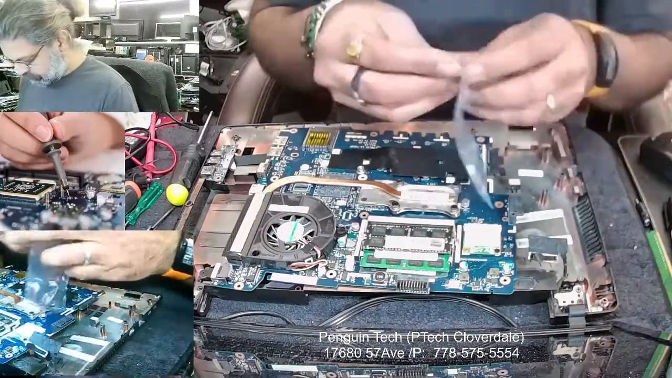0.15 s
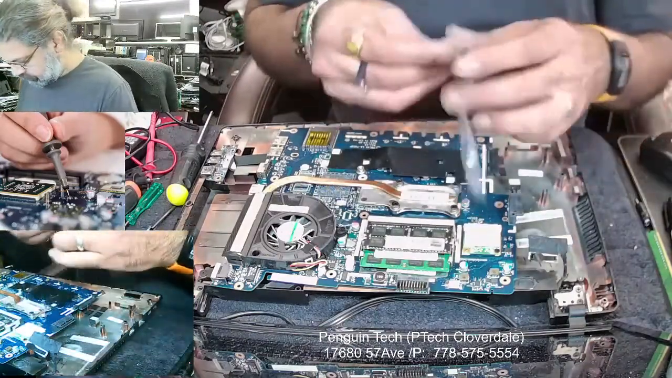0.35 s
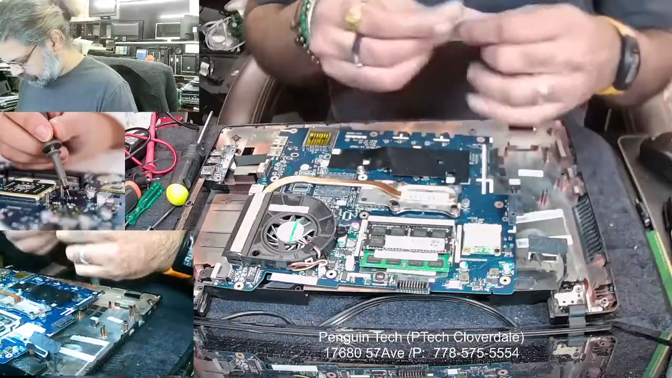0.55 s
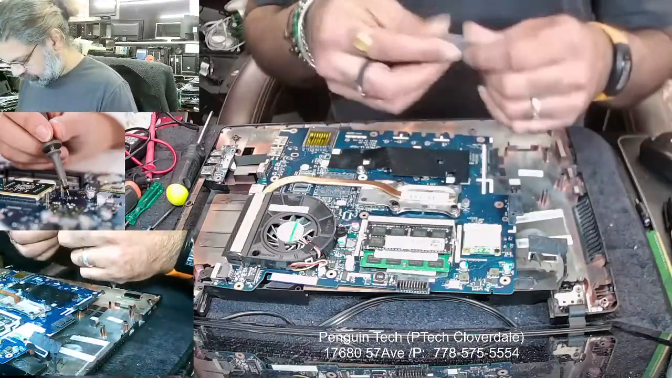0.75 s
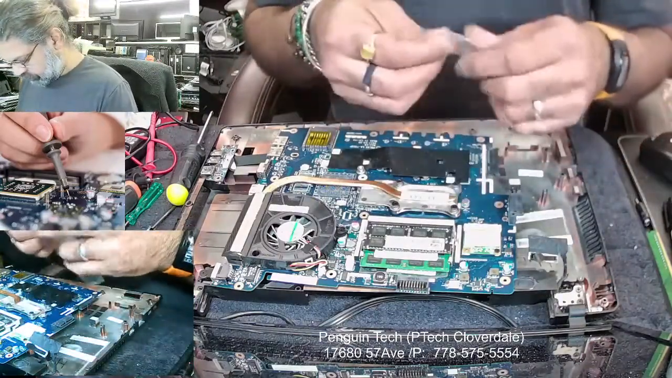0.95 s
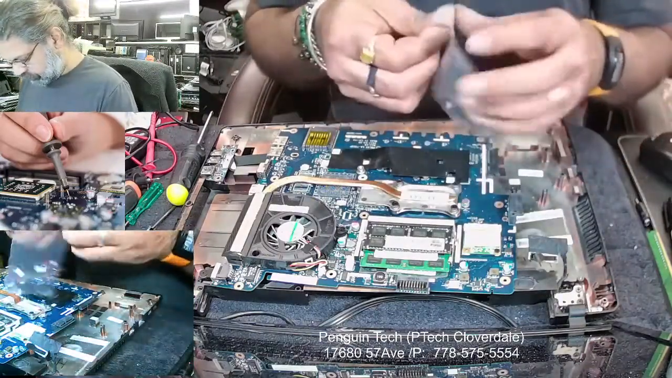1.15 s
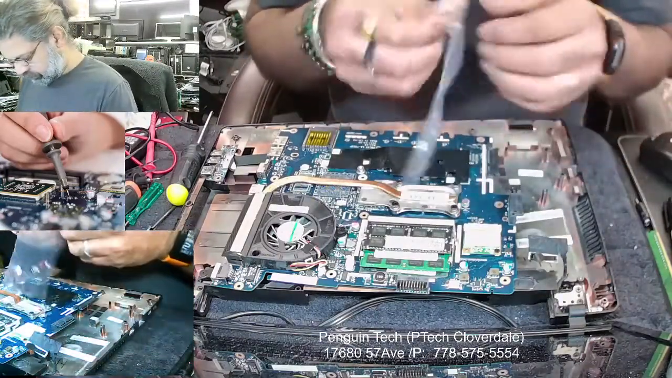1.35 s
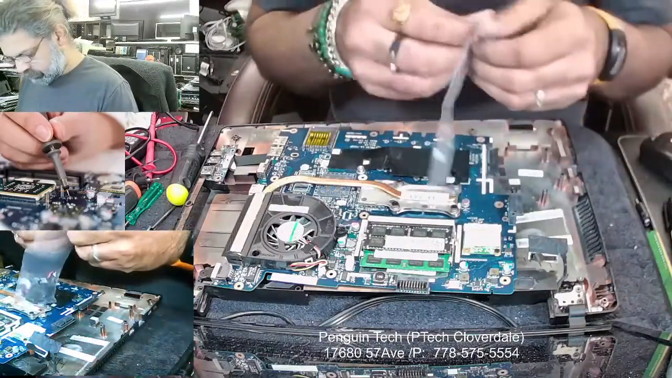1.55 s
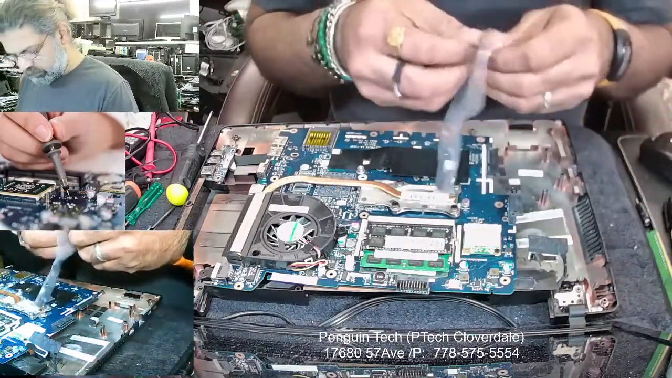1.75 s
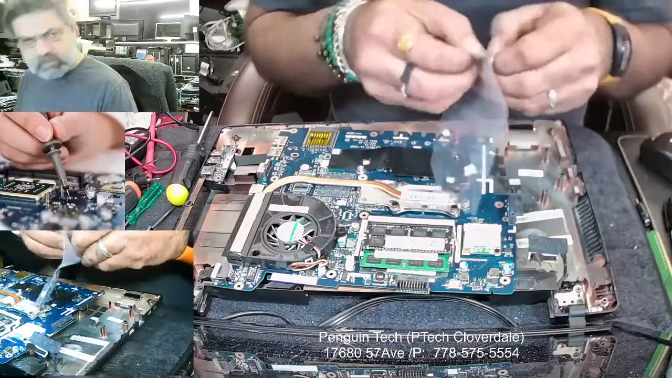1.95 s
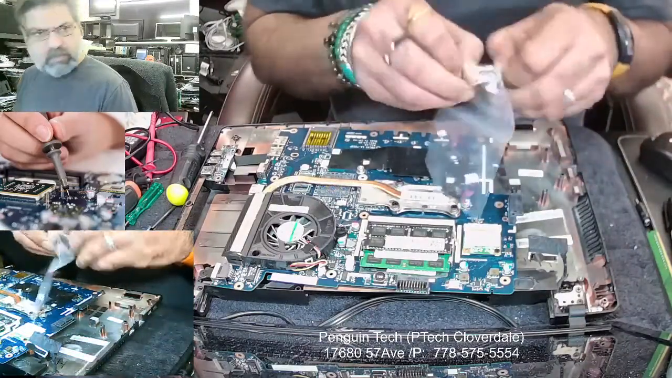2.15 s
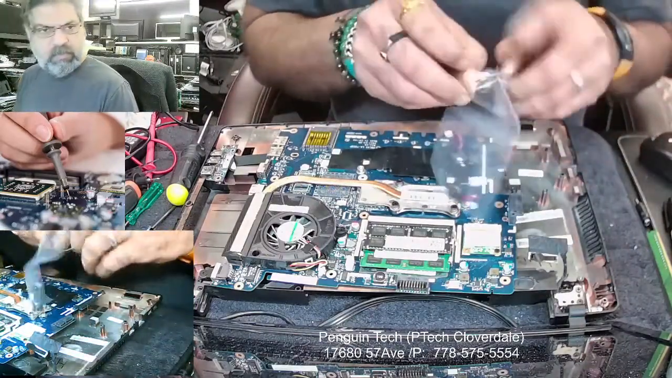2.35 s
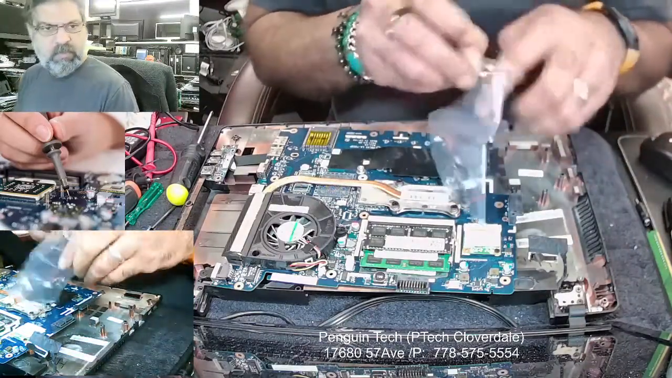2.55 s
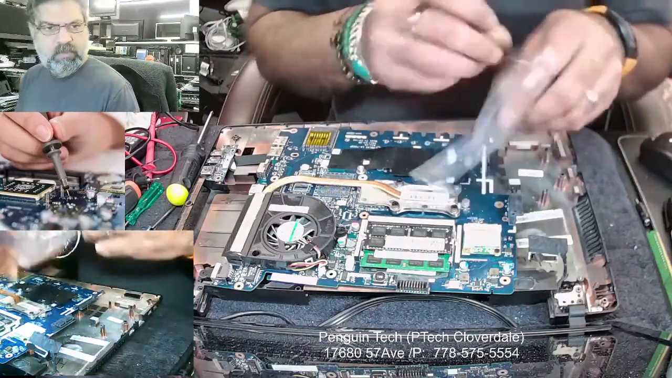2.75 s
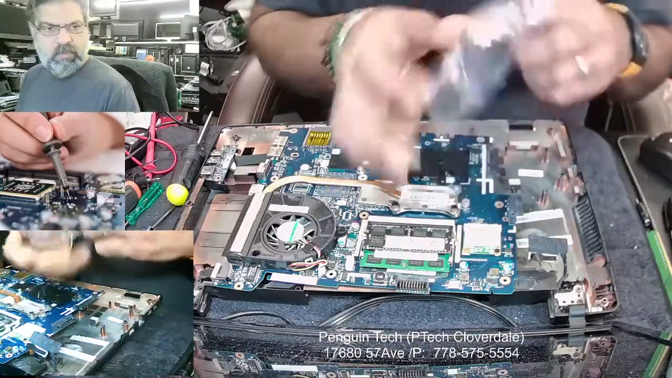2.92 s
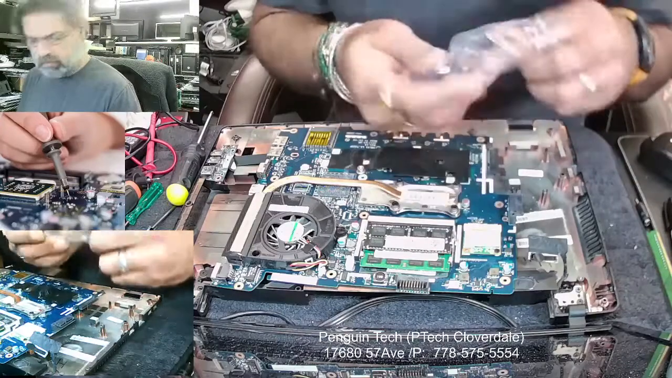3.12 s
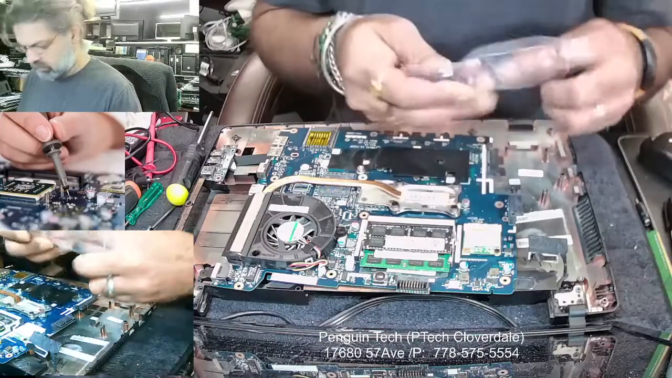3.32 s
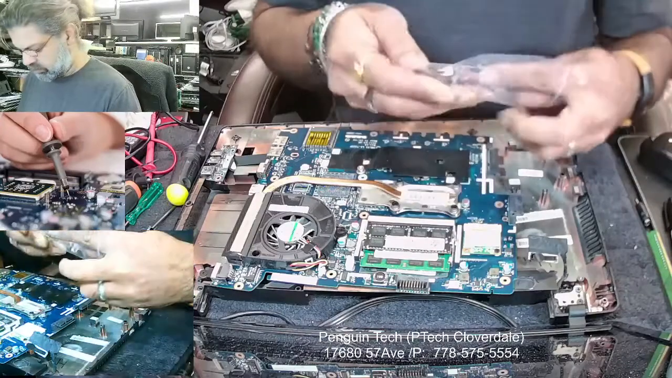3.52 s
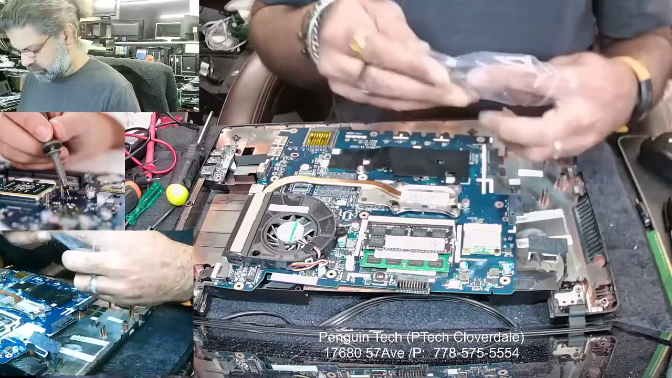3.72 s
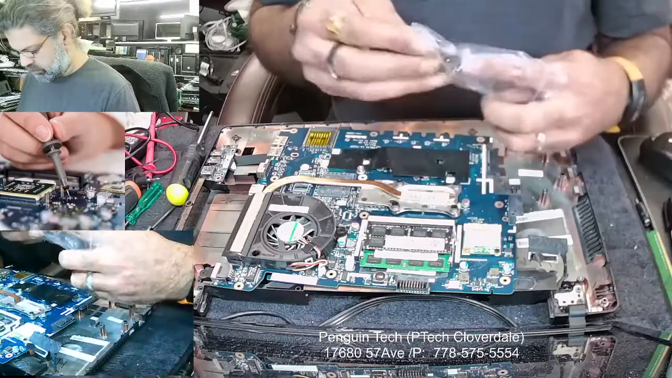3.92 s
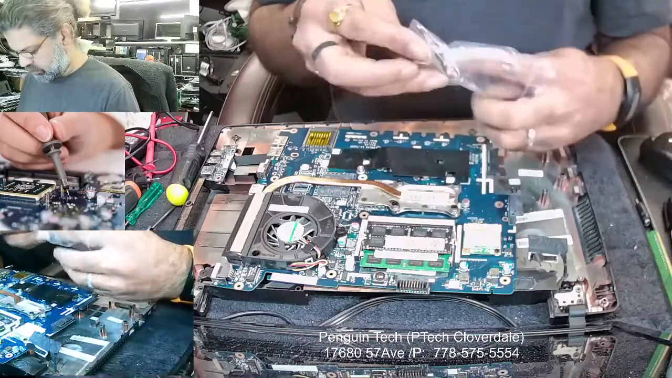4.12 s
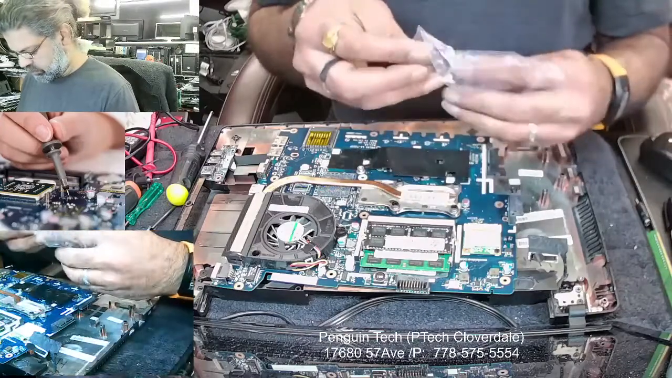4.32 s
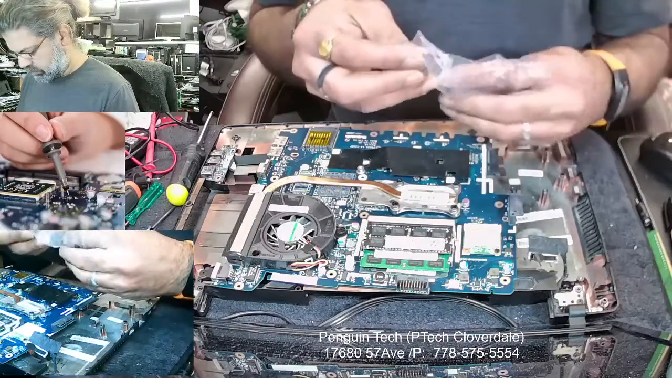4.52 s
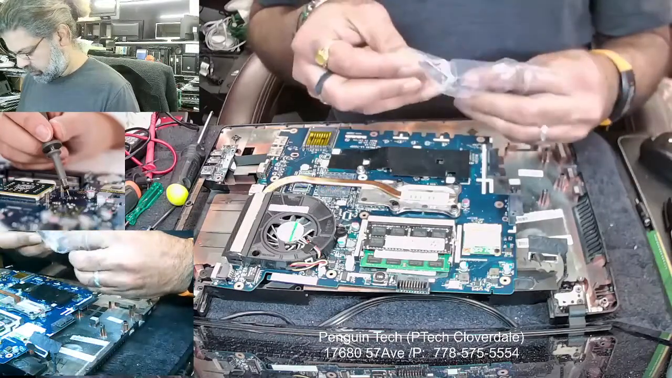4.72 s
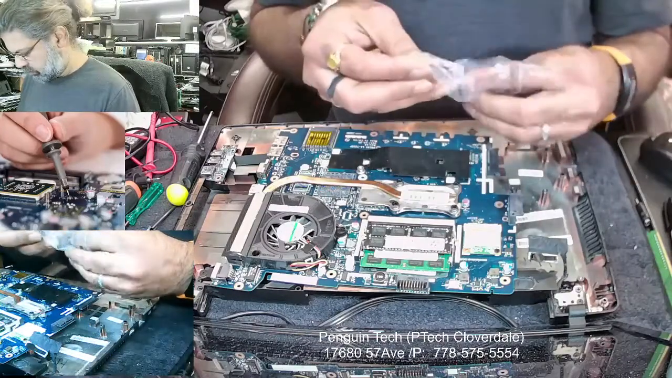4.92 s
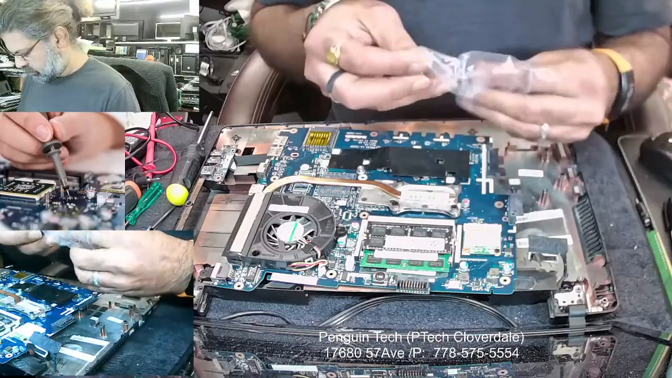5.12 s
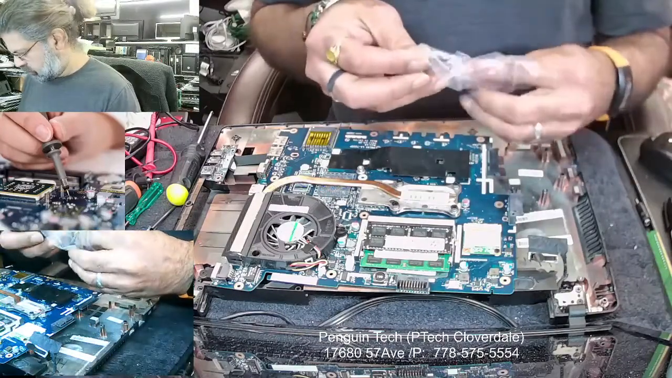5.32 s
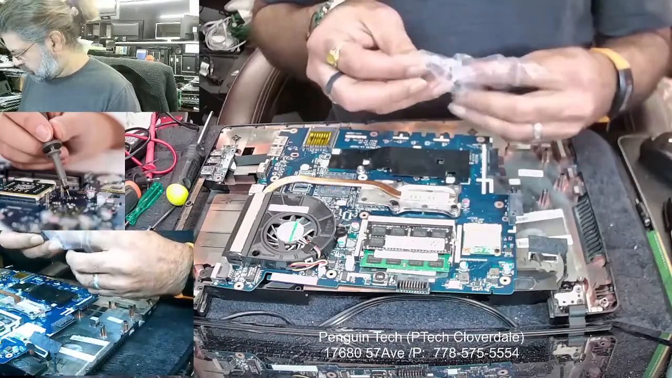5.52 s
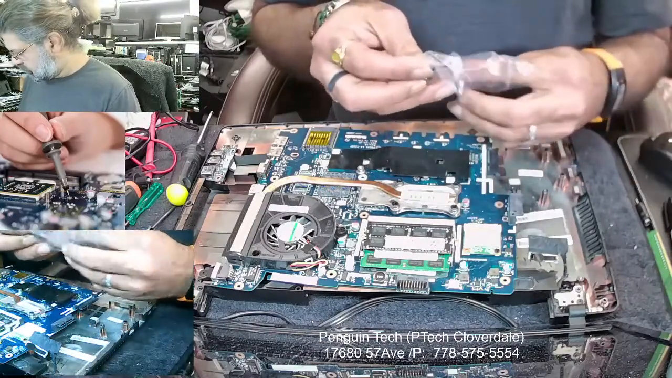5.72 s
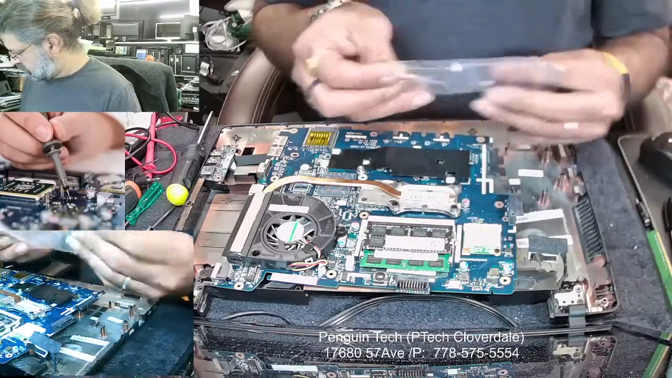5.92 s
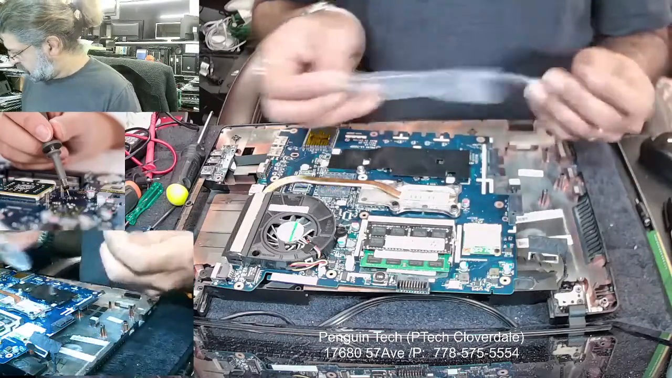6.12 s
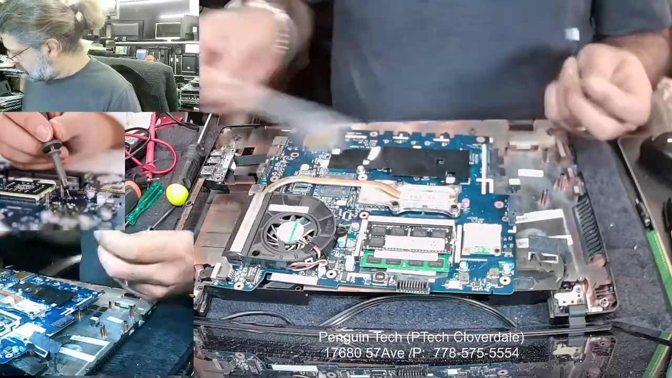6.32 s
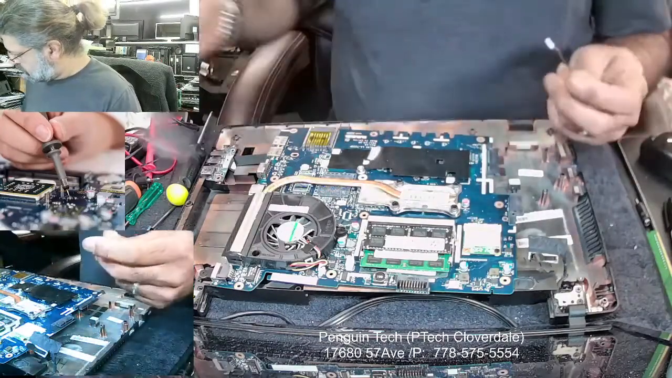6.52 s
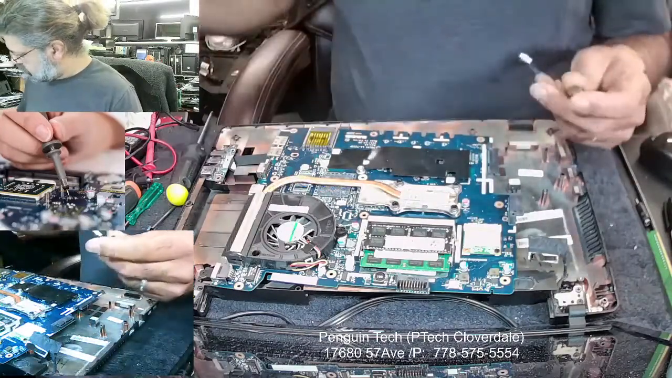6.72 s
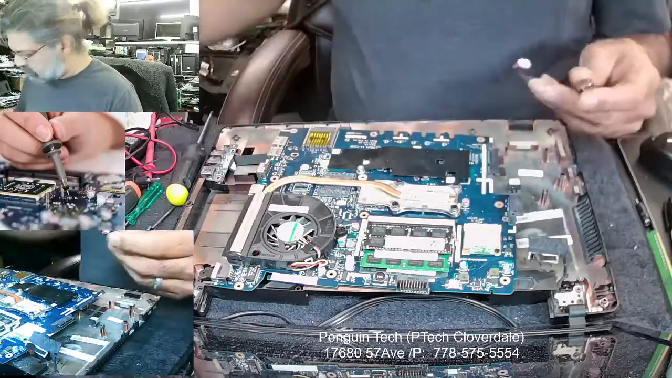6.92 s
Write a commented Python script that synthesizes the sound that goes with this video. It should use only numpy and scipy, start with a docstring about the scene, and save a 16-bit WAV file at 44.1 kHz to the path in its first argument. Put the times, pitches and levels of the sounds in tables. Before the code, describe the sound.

Hands work open a little plastic bag with crisp, uneven crackling that builds and then thins, against low room hum.

```python
"""Two hands worry open a small, stiff plastic bag over a workbench, heard through a narrow-band microphone.
From the start, mains hum, fan tones and room air fill the small shop. A few creases buckle, each snap
ringing three patches of film. From about 2 to 3 s the snaps crowd together and fine crackle fills the
loudest bursts, while a distant engine drones past. A weaker flurry comes near 4 s; then the snaps
thin out and end, and the hum remains."""
import sys
import numpy as np
from scipy import signal
from scipy.fft import rfft, irfft
from scipy.io import wavfile

SR = 44100
rng = np.random.default_rng(int(sys.argv[2]) if len(sys.argv) > 2 else 0)


def digitize_waveform(pressure):
    """Quantize a signal to 16-bit integers and store it at the path in sys.argv[1].

    Rows of a 2-D input are taken as channels; values are limited to [-1, 1].
    """
    field = np.atleast_2d(pressure).T
    bounded = np.clip(field, -1, 1)
    quanta = np.round(bounded * 32767).astype(np.int16)
    wavfile.write(sys.argv[1], SR, quanta)


N = 307377

# buckling creases: (time [s], level [dB], main patch [Hz], width [ms], side patches re main [dB])
SNAPS = [(.173, -37, 6490, .55, -1.5), (0.189, -33.5, 4970, 1.07, -2.5), (0.2243, -35.5, 4350, 1.5, -6),
         (0.8494, -44, 4130, 1.86, -27), (0.9258, -41.5, 6930, 0.71, -21), (1.037, -57, 4390, 0.65, -5),
         (1.199, -42.5, 5485, 2, -6.5), (1.2134, -41.5, 3985, 0.88, -6.5), (1.2999, -38, 4220, 2, -17),
         (1.336, -41.5, 4900, 0.62, -25), (1.3611, -44, 4370, 1, -14), (1.391, -51, 4960, 1.56, -19),
         (1.418, -48.5, 4630, 0.76, -13), (1.614, -50, 4236, 4, -18), (1.8265, -35, 5130, 1.5, -10),
         (1.864, -21.5, 4350, 0.89, -11.5), (1.886, -36.5, 5570, .8, -4), (1.9132, -37.5, 5180, 1.3, -10.5),
         (1.926, -37.5, 3770, .9, -13.5), (1.941, -34, 4400, 0.75, -1.5), (1.9497, -26, 4080, 0.69, -6.5),
         (1.982, -52.5, 4480, .6, 4.5), (2.0839, -29, 3150, 1.1, -7.5), (2.096, -31, 3034, 1.03, -5.5),
         (2.1124, -33, 2900, 2.4, -1), (2.127, -25.5, 5260, .5, -4), (2.152, -33, 4330, 0.75, -4),
         (2.237, -28, 4860, 1.8, -15.5), (2.2462, -37.5, 2810, 1.2, 0), (2.2723, -28, 4190, 0.93, -5.5),
         (2.2906, -27.5, 3960, 0.73, -2), (2.3201, -25.5, 2996, 1.11, -1.5), (2.342, -42, 4810, 0.76, -17),
         (2.428, -35, 4220, .8, -13.5), (2.4569, -33, 3970, .7, -5), (2.4831, -19, 4140, 0.65, -8),
         (2.4946, -15.5, 4530, 0.7, -17.5), (2.5275, -27, 4350, 0.75, -5), (2.5326, -20, 4260, 0.6, -3),
         (2.539, -23, 4690, .9, -10.5), (2.6139, -26, 5350, .6, -1.5), (2.63, -35, 4760, 1.06, -10),
         (2.6356, -29, 4930, 0.89, -11), (2.695, -36, 4120, 0.83, 4.5), (2.7063, -34, 4480, 0.68, -2),
         (2.7239, -34, 4370, .8, -5.5), (2.743, -44, 4600, 0.54, -2), (2.757, -35.5, 4110, 1.02, -4),
         (2.767, -33.5, 4070, .9, -5.5), (2.8676, -38.5, 4610, 0.49, -2), (2.896, -31, 4820, 0.76, -6.5),
         (2.9239, -23.5, 4100, 1.15, 0), (2.933, -31, 4700, 1.2, -9.5), (2.9397, -26.5, 4410, 0.9, -19),
         (2.9493, -40, 4820, .6, -9.5), (2.968, -29.5, 4100, .7, -5), (2.9854, -30, 5016, 2.43, -6.5),
         (3.075, -32, 4870, .6, -7.5), (3.0876, -38, 4260, 0.56, -16.5), (3.1572, -45.5, 4700, 0.71, -0.5),
         (3.222, -41.5, 4075, 0.95, -30), (3.2478, -46, 4150, .9, -4), (3.307, -50, 4600, .7, -1),
         (3.426, -57, 4760, 0.93, -0.5), (3.464, -46, 4255, 0.6, -7), (3.637, -55, 4150, 2.1, -19),
         (3.655, -50, 3985, 4.4, -19), (3.744, -44.5, 5140, 2.7, -20), (3.766, -54.5, 3574, 5.4, -23),
         (3.8238, -35, 5050, 0.9, -16), (3.834, -45.5, 4710, 1.7, -5.5), (3.939, -26, 5220, 0.85, -6.5),
         (3.964, -37, 4600, 2.2, -8.5), (4.019, -29.5, 4480, 0.5, -11), (4.05, -39.5, 4960, .6, -5.5),
         (4.066, -44, 4490, 0.53, -9.5), (4.114, -49.5, 4290, 0.24, 0), (4.139, -53, 5190, 0.44, -3.5),
         (4.164, -40, 4360, 0.98, -14), (4.18, -28.5, 5230, 0.66, -17.5), (4.184, -30.5, 3050, 0.84, -5.5),
         (4.1887, -32.5, 4780, 0.86, -7.5), (4.213, -42.5, 4930, 0.82, 0), (4.275, -51.5, 3505, 0.62, 1),
         (4.306, -42, 3086, 2.7, -4), (4.334, -38, 4960, .6, -8.5), (4.34, -33, 3900, 0.95, -7.5),
         (4.356, -39.5, 4280, 2.2, -9.5), (4.374, -45, 4060, 0.87, -4.5), (4.42, -46, 4640, 3.5, -15.5),
         (4.4972, -41.5, 4150, 2, -27), (4.506, -42, 4030, 1.2, -12.5), (4.5201, -36, 4205, 1.87, -42),
         (4.551, -37, 4400, 0.88, -19.5), (4.6215, -60, 4630, .8, -7), (4.626, -22.5, 4535, 0.75, -21),
         (4.6821, -37, 4560, .55, -10.5), (4.7278, -45.5, 4430, 0.78, -8), (4.7729, -40.5, 4600, 0.8, -12),
         (4.811, -52.5, 4760, 1.2, -13), (4.835, -54.5, 4430, 1.8, -8.5), (4.9287, -47.5, 4200, .6, -2.5),
         (4.9647, -51, 4400, 0.86, -15), (4.974, -46.5, 4410, 1.9, -25), (5.057, -48.5, 4220, 0.55, -5),
         (5.083, -44, 4110, 0.84, -12.5), (5.112, -32, 4520, 0.84, -28), (5.1342, -35.5, 4450, 1.15, -29),
         (5.169, -33, 4240, 0.79, -12.5), (5.195, -31, 4690, 1.1, -30), (5.202, -47, 4910, 0.63, -13.5),
         (5.283, -59, 5050, .5, -1.5), (5.357, -42, 4820, 1.6, -34), (5.368, -47, 4420, 1.1, -10),
         (5.415, -53.5, 6150, 0.65, 2), (5.432, -47, 6360, 0.84, -11.5), (5.4562, -49, 5170, 4.5, -3),
         (5.489, -45.5, 3330, .8, -8), (5.563, -51.5, 4800, .5, -9), (5.63, -48, 4960, 0.8, -7.5),
         (5.6464, -45.5, 4100, .75, -5), (5.685, -44, 5000, 0.47, -8.5), (5.7154, -41, 5390, 1.6, -31),
         (5.7449, -40.5, 4463, 4.1, -11.5), (5.861, -47, 4960, 0.83, -10.5), (5.886, -51, 4800, 0.5, -8.5),
         (5.917, -50, 4570, 1.03, -10.5), (6.011, -56.5, 4800, .45, 0.5), (6.024, -52.5, 4580, 0.52, -6),
         (6.1354, -48, 4690, 0.46, -8.5),  (6.349, -64, 5150, 0.48, -1)]
# colour that film and microphone give to a crack: (frequency [Hz], relative gain [dB])
FILM_SPECTRUM = [(300, -77), (1000, -35), (2300, -17), (2700, -8.5), (3500, -13), (4150, 0), (5000, -0.5),
                 (6000, -5.5), (6900, -8.5), (8000, 4.5)]
# natural frequencies of small patches of film: (frequency [Hz])
PATCH_HZ = [2706, 3002, 3347, 3693, 4220, 4540, 4600, 4960, 5800, 5750, 5740, 6850]
RISE_WIDTHS = 1.5   # widths a pop takes to reach its peak


def from_db(db):
    """Decibels to amplitude ratio."""
    return 10 ** (np.asarray(db) / 20)


def rms_one(x):
    """Normalisation to unit rms."""
    return x / np.sqrt(np.mean(x ** 2) + 1e-20)


def add(out, s, burst):
    """Superposition of a burst, starting at time s."""
    i = max(round(s * SR), 0)
    out[i:i + len(burst)] += burst[:N - i]


def coloured(x, spectrum):
    """Minimum-phase filtering by a (frequency [Hz], gain [dB]) curve."""
    hz, db = np.transpose(spectrum)
    grid = np.maximum(np.fft.rfftfreq(4096, 1 / SR), 1)
    cepstrum = irfft(np.log(from_db(np.interp(np.log(grid), np.log(hz), db))))
    cepstrum[1:2048] *= 2   # folding the cepstrum makes the filter causal
    cepstrum[2049:] = 0
    return signal.fftconvolve(x, irfft(np.exp(rfft(cepstrum))))[:len(x)]


def drift(per_s):
    """Slow fluctuation: linear interpolation between random knots."""
    return np.interp(np.arange(N) / SR * per_s, np.arange(400), rng.standard_normal(400))


def hum_and_fans():
    """Steady tones of the mains and two fans; close pairs beat by interference."""
    # mains hum, then blade tones: (frequency [Hz])
    tone_hz = [120.0, 259.07, 345.41, 352.86, 388.56, 427.01, 431.76, 518.06, 533.7]
    # strength of each tone: (rms level [dB])
    tone_db = [-72.5, -86, -78.5, -93, -91, -80.5, -82.5, -88.5, -91]
    t = np.arange(N) / SR
    return np.sqrt(2) * sum(from_db(db) * np.sin(2 * np.pi * (hz * t + rng.random()))
                            for hz, db in zip(tone_hz, tone_db))


def distant_engine():
    """Harmonics of the engine cycle swell and fade, sinking in pitch as it passes."""
    # the engine's passage: (time [s], cycle rate [Hz], level [dB])
    passage = [(0, 53, -100), (.4, 52.5, -95), (1.0, 49.1, -85), (1.9, 49.5, -82.5), (2.3, 48.54, -81),
               (3.0, 48.1, -82.5), (3.5, 47.2, -90.5), (4.2, 47.4, -105)]
    # its harmonics: (multiple of the cycle rate, relative level [dB])
    orders = [(2, 0), (3, -4), (4, -6), (5, -7)]
    times, *curves = np.transpose(passage)
    cycle_hz, level_db = (np.interp(np.arange(N) / SR, times, curve) for curve in curves)
    turns = np.cumsum(cycle_hz) / SR
    drone = sum(from_db(db + drift(1.2)) * np.sin(2 * np.pi * k * turns) for k, db in orders)
    return np.sqrt(2) * from_db(level_db) * drone


def room_air():
    """Stationary broadband noise, strongest at low frequencies."""
    # room air: (frequency [Hz], relative spectral density [dB])
    spectrum = [(25, -6), (55, -17.5), (100, 2), (200, -1.5), (400, 0.5), (700, -4.5), (2000, -5.5),
                (4500, -11), (7000, -14)]
    return from_db(-72) * rms_one(coloured(rng.standard_normal(N + 4096), spectrum)[4096:])


def reflections(x):
    """Reverberation: sparse echoes off the bench, one wall echo, then a dense, exponential decay."""
    t60_s, wall_s = .29, .036
    reverb_db, wall_db, bench_boost_db = -8, -25, 3.5
    t = np.arange(round(.4 * SR)) / SR
    density = np.minimum(.017 + 4 * t, 1)
    echoes = rng.standard_normal(len(t)) * (rng.random(len(t)) < density) / np.sqrt(density)
    echoes *= from_db(-60 * t / t60_s + bench_boost_db * (t < wall_s)) * (t > .002)
    echoes *= from_db(reverb_db) / np.linalg.norm(echoes)
    echoes[round(wall_s * SR)] = from_db(wall_db)
    return signal.fftconvolve(x, echoes)[:N]


def pop(hz, width_s, phase):
    """Transient of one resonance: it swells to unit amplitude and decays a little more slowly."""
    t = np.arange(round(6 * width_s * SR)) / SR
    x = t / (RISE_WIDTHS * width_s)
    envelope = (x * np.exp(1 - x)) ** (2 * RISE_WIDTHS ** 2)
    return envelope * np.sin(2 * np.pi * (hz * t + phase))


def singing():
    """Damped free vibration: taut film sings on, fluttering in amplitude and phase; low tones last longer."""
    # patches and faces left ringing when a crease gives way: (time [s], level [dB], frequency [Hz])
    rings = [(0.186, -60.5, 1316), (0.195, -67, 2040), (1.193, -56.5, 3014), (1.2, -62, 3770),
             (1.194, -66, 7050), (1.196, -56, 4300), (1.195, -57.5, 5560), (1.301, -61, 3980),
             (1.3, -54.5, 4940), (1.611, -58, 5750), (1.615, -55.5, 5054), (1.612, -53.5, 4270),
             (1.621, -63, 3340), (1.634, -68, 2700), (1.65, -74, 823), (2.241, -56.5, 1694),
             (2.26, -62, 1410), (2.285, -67, 1135), (2.479, -55, 1780), (2.535, -71, 950),
             (2.69, -62.5, 1437), (2.7, -60.5, 1750), (2.71, -64.5, 970), (2.916, -58, 1730),
             (2.915, -67, 940), (2.915, -68.5, 688), (3.074, -57, 2700), (3.22, -50, 4160),
             (3.301, -61, 3180), (3.934, -60, 1714), (4.07, -70, 884), (4.186, -72.5, 942),
             (4.299, -53, 5150), (4.335, -60, 6400), (4.42, -58, 4640), (4.497, -60.5, 2277),
             (4.5, -62.5, 3086), (4.629, -58, 6000), (4.629, -60, 3250), (4.929, -57, 4600),
             (5.2, -60, 4950), (5.199, -59, 4100), (5.199, -56, 4580), (5.2, -65, 3200), (5.355, -66, 2850),
             (5.43, -75, 6200), (5.452, -54.5, 3547), (5.46, -62, 2705), (5.678, -55, 5550),
             (5.68, -57, 3870), (5.714, -60, 5340), (5.744, -55, 3400)]
    swell_s, flutter_hz = .006, 39.8
    out, t = np.zeros(N), np.arange(round(.35 * SR)) / SR
    noise = rng.standard_normal((len(rings), 2, len(t) + 2000))
    flutter = signal.sosfilt(signal.butter(2, flutter_hz, fs=SR, output="sos"), noise)[..., 2000:]
    for (s, db, hz), (in_phase, quadrature) in zip(rings, rms_one(flutter)):
        decay_db_per_s = 251 * (hz / 3000) ** .35
        envelope = np.minimum(t / swell_s, 1) * from_db(db - decay_db_per_s * t)
        angle = 2 * np.pi * hz * t
        add(out, s, envelope * ((.92 + in_phase) * np.sin(angle) + quadrature * np.cos(angle)))
    return out


def knocks():
    """Impact excitation of the bag's wide faces: dull clusters of five pops near one pitch."""
    # fingers and parts striking the faces: (time [s], level [dB], frequency [Hz])
    impacts = [(1.348, -59, 610), (2.717, -51.5, 480), (4.183, -49, 2340)]
    out = np.zeros(N)
    for s, db, hz in impacts:
        for lag, detune, phase in rng.random((5, 3)):
            face = pop(hz * (1 + .16 * (detune - .5)), width_s=.0044, phase=phase)
            add(out, s - .004 + .022 * lag, from_db(db - 6 - 5.5 * lag) * face)
    return out


def ticks():
    """Band-limited noise bursts of a few milliseconds, heard as thin, bright ticks."""
    # ticks above the crackle: (time [s], gain [dB])
    bursts = [(0.1736, -52.5), (2.613, -45)]
    out = np.zeros(N)
    treble = signal.butter(4, [7800, 12000], "band", fs=SR, output="sos")
    for s, db in bursts:
        add(out, s - .002, from_db(db) * signal.sosfilt(treble, rng.standard_normal(190) * np.hanning(190)))
    return out


def side_patches(hz):
    """Two resonances flank the main one; at the ends of the range they fold back inwards."""
    below, above = .774, 1.24   # frequency ratios
    second_hz = np.where(hz < 3300, hz * above ** 2.2, hz * below)
    third_hz = np.where(hz * above > 7000, hz * below ** 2, hz * above)
    return second_hz, third_hz


def taut_patches():
    """Selective resonance: patches tuned near the latest snap are taut and ring best (dB over time)."""
    s, _, main_hz, _, side_db = np.transpose(SNAPS)
    lead_s, loss_db_per_hz = .012, .03   # tension builds just before a snap
    latest = np.maximum(np.searchsorted(s - lead_s, np.arange(N) / SR) - 1, 0)
    main, second, third = (-loss_db_per_hz * np.abs(np.array(PATCH_HZ)[:, None] - hz)
                           for hz in (main_hz, *side_patches(main_hz)))
    best_db = np.maximum(main, side_db + np.maximum(second, third))
    return np.maximum(best_db, -16)[:, latest]


def kneading():
    """Incoherent addition: the powers of squeezes and idle rustle sum to the crackle's drive in dB."""
    # squeezes of the bag: (time [s], level [dB], hold [s], fade [s])
    squeezes = [(0.177, -41, 0.042, 0.25), (0.944, -59, 0.0097, 0.17), (1.206, -48, 0.0059, 0.083),
                (1.3, -59, 0.1, 0.78), (1.628, -51.5, 0.029, 0.076), (1.821, -42, 0.016, 0.1),
                (1.938, -45, 0.0091, 0.051), (2.098, -32.5, 0.02, 0.13), (2.24, -31.5, 0.12, 0.078),
                (2.414, -34.5, 0.12, 0.059), (2.525, -26.5, 0.014, 0.087), (2.634, -25.5, 0.0069, 0.058),
                (2.697, -25.5, 0.015, 0.14), (2.883, -33.5, 0.022, .1), (2.916, -24, 0.018, 0.18),
                (3.075, -36.5, 0.0062, 0.29), (3.242, -53, 0.012, 0.13), (3.32, -39.5, 0.0097, 0.053),
                (3.423, -46.5, 0.0067, 0.045), (3.56, -56.5, 0.044, .2), (3.634, -48.5, 0.0092, 0.32),
                (3.735, -53, 0.19, 0.27), (3.976, -35, 0.017, 0.083), (4.16, -39, 0.0088, 0.21),
                (4.35, -39.5, 0.011, 0.14), (4.496, -48, 0.064, 0.12), (4.63, -50.5, 0.019, 0.6),
                (4.963, -46, .01, 0.077), (5.11, -53, 0.062, 0.14), (5.341, -43.5, 0.022, 0.031),
                (5.461, -44.5, 0.0085, 0.045), (5.63, -59, .01, 0.17), (5.67, -44.5, 0.0092, 0.29),
                (5.811, -53.5, 0.061, 0.071)]
    rise_db_per_s, fade_db, idle_db = 695, 33.5, -68.5
    t, power = np.arange(0, N, 64) / SR, from_db(2 * idle_db)
    for s, db, hold_s, fade_s in squeezes:
        loss_db = rise_db_per_s * np.maximum(s - t, 0) + fade_db * np.maximum(t - s - hold_s, 0) / fade_s
        power = power + from_db(2 * (db - loss_db))
    return np.interp(np.arange(N) / SR, t, 10 * np.log10(power))


def grains(per_s, pitches_hz, width_cycles, shares_db, all_at_once=False):
    """Shot noise: small creases pop in random clumps, each exciting one resonance or all at once."""
    sizes = from_db(6.3 * np.minimum(rng.exponential(1, N), 3.5)) * rng.choice([-1, 1], N)
    impulses = sizes * (rng.random(N) < per_s * from_db(5 * drift(45)) / SR)
    struck = rng.integers(0, len(pitches_hz), N)
    out = np.zeros(N)
    for k, (hz, db) in enumerate(zip(pitches_hz, shares_db)):
        drive = impulses * ((struck == k) | all_at_once) * from_db(db)
        out += signal.fftconvolve(drive, pop(hz, width_cycles / hz, 0))[:N]
    return out


def crackle():
    """Amplitude modulation: kneading drives dense and lone ticks, ringing patches and the bag's hollow."""
    drive_db = kneading()
    hollow_hz = np.geomspace(620, 2400, 14)
    dense = grains(1700, np.geomspace(2600, 6800, 5), width_cycles=.91, shares_db=np.zeros(5))
    ringing = grains(1300, PATCH_HZ, width_cycles=11, shares_db=taut_patches())
    hollow = grains(1300, hollow_hz, width_cycles=13.3, shares_db=8.9 * np.log2(hollow_hz / 1000))
    lone = grains(110, np.geomspace(3300, 6600, 4), width_cycles=.59, shares_db=np.zeros(4),
                  all_at_once=True)
    return (from_db(drive_db - 12.5) * rms_one(coloured(dense, FILM_SPECTRUM))
            + from_db(drive_db - 17.5) * rms_one(ringing)
            + from_db(.69 * (drive_db + 37.5) - 72) * rms_one(hollow)
            + from_db(.5 * drive_db - 48) * rms_one(coloured(lone, FILM_SPECTRUM)))


def three_patches(hz, width_s, side_db, bend, phase):
    """Modal superposition: a main patch and two side patches, detuned in opposite directions."""
    sides = sum(pop(f / bend, width_s, k * phase) for k, f in zip((3, 7), side_patches(hz)))
    return pop(hz * bend, width_s, phase) + from_db(side_db) * sides


def snaps():
    """Buckling: a crease cracks and rings three patches, amid six weaker slips slightly off pitch."""
    slip_spread_s, slip_detune = .015, .05
    rings, cracks = np.zeros(N), np.zeros(N)
    chance = rng.random((len(SNAPS), 27))
    tiny_breaks = rng.standard_normal((len(SNAPS), 80)) * np.hanning(80) ** 2
    for (s, db, hz, width_ms, side_db), draws, crack in zip(SNAPS, chance, tiny_breaks):
        width_s = max(width_ms, .3) / 1000
        onset_s = s - RISE_WIDTHS * width_s
        add(rings, onset_s, from_db(db) * three_patches(hz, width_s, side_db, bend=.99, phase=draws[0]))
        crack_db = db - 1 - 1.7 * width_ms + .4 * side_db   # brief snaps with strong sides crack most
        add(cracks, s - .0011, from_db(crack_db) * rms_one(crack))
        for lag, weaker, detune, phase in draws[3:].reshape(6, 4):
            slip = three_patches(hz, width_s, side_db, 1 + slip_detune * (detune - .5), phase)
            add(rings, onset_s - .0055 + slip_spread_s * lag, from_db(db - 6.5 - 11 * weaker) * slip)
    radiation = signal.butter(6, 2340, "high", fs=SR, output="sos")   # small patches radiate no lows
    return signal.sosfilt(radiation, rings + coloured(cracks, FILM_SPECTRUM))


def scene():
    """Direct sound, reflections and background add at a low-pass microphone; the ticks reach higher."""
    bag = snaps() + crackle() + knocks() + singing()
    heard = bag + reflections(bag) + hum_and_fans() + distant_engine() + room_air()
    microphone = signal.cheby1(10, 1, 7060, fs=SR, output="sos")
    return (signal.sosfilt(microphone, heard) + ticks())[None]


def record(dry):
    """Spectral imaging in the converter adds faint treble; peaks saturate softly, over circuit hiss."""
    converter_hz, cutoff_hz = 16000, 15800
    hiss_db, image_db, headroom = -90, -58, 1.8
    hiss = from_db(hiss_db) * rng.standard_normal(dry.shape)
    mirrored = dry * np.cos(2 * np.pi * converter_hz * np.arange(N) / SR)
    image = signal.sosfilt(signal.butter(4, [10000, 13000], "band", fs=SR, output="sos"), mirrored)
    rounded = headroom * np.tanh(dry / headroom)
    top_cut = signal.cheby2(12, 40, cutoff_hz, fs=SR, output="sos")
    return signal.sosfilt(top_cut, rounded + from_db(image_db) * image + hiss)


dry = scene()
out = record(dry)
digitize_waveform(out)
```